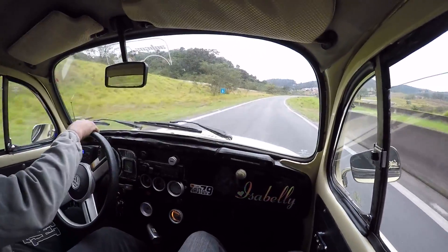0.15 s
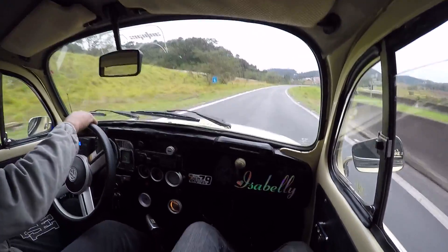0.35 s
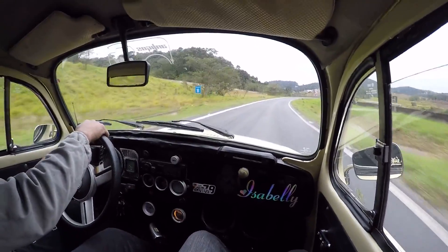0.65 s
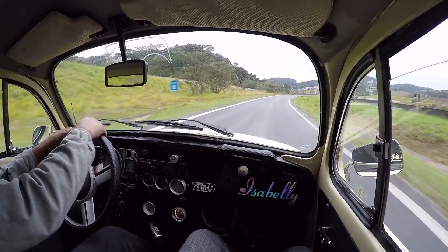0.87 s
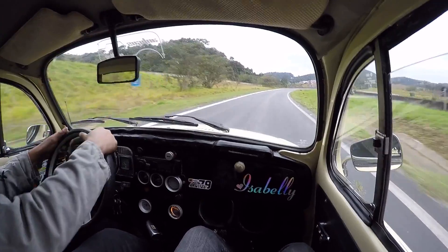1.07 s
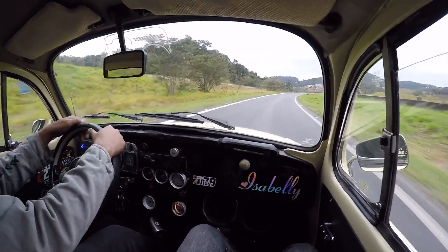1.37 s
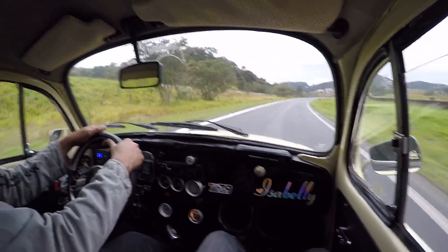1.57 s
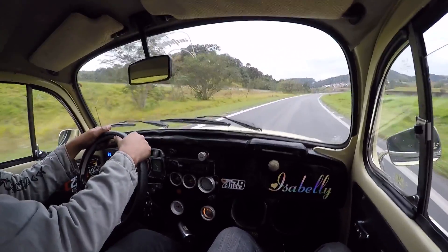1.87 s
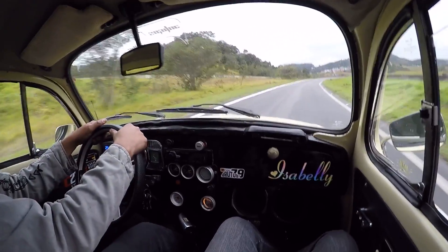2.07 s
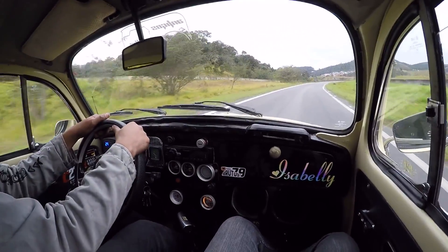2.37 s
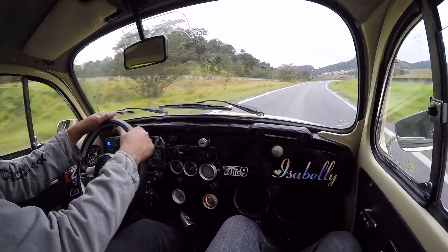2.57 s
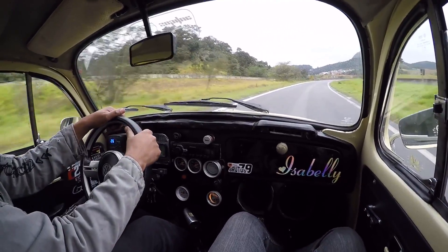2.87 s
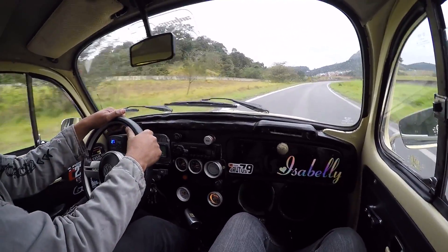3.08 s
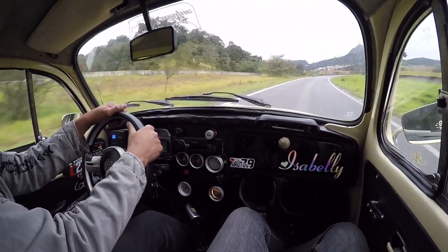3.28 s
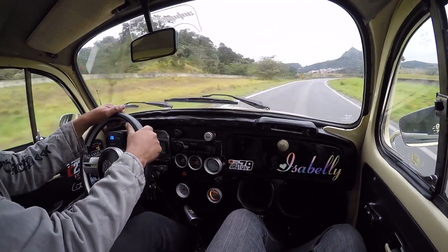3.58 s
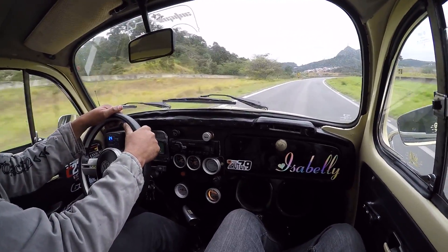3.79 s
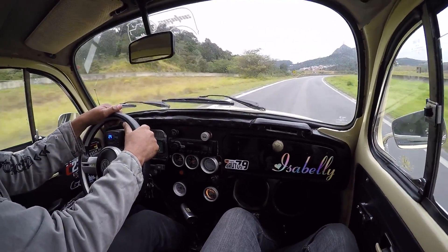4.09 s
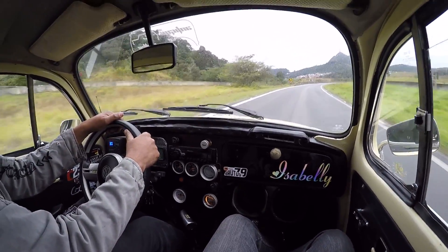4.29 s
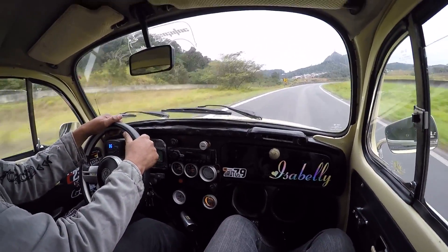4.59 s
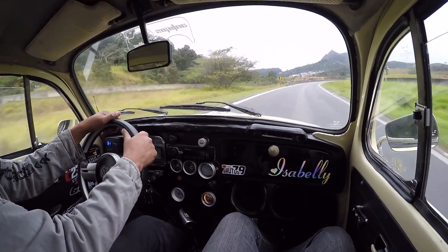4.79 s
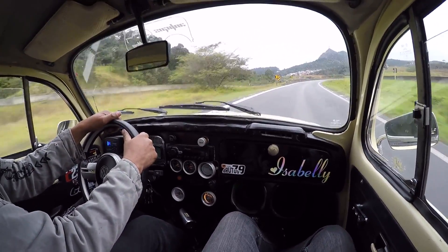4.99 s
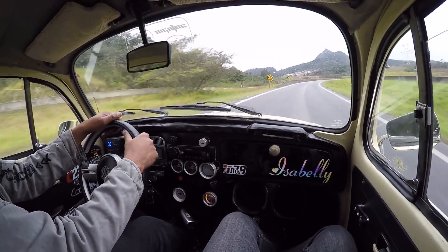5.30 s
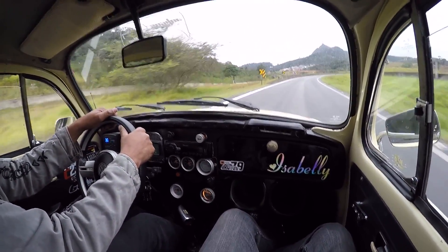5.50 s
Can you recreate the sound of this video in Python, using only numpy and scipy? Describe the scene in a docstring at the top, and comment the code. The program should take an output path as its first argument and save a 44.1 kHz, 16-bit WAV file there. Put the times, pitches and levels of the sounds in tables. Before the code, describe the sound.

Heard from a microphone inside an old car's cabin, an air-cooled four-cylinder engine drones loudly and slowly rises in pitch. Reflected tyre noise rushes off roadside walls in the first second. Low suspension rumble and irregular dull floor thumps continue, with a few faint trim ticks, a subtle pulsing knock midway and a brief rumble swell near four seconds.

```python
"""Inside an old car with an air-cooled four-cylinder engine that slowly gains speed on a country road.
Throughout, engine tones boom through the cabin over filtered noise: road rumble, bumps, roar, fan and wind.
Three roadside walls throw back a rush of noise in the first second; from 1.7 s the trim ticks four times.
Around 2.6 s a knock returns once per wheel turn, and from 2.2 to 4.6 s one engine tone whines faintly.
Near 4 s the road rumble swells briefly."""
import sys
import numpy as np
from scipy import signal
from scipy.io import wavfile
from scipy.ndimage import uniform_filter1d

SR = 44100
rng = np.random.default_rng(int(sys.argv[2]) if len(sys.argv) > 2 else 0)


def digitize_waveform(pressure):
    """Quantize a signal to 16-bit integers and store it at the path in sys.argv[1].

    Rows of a 2-D input are taken as channels; values are limited to [-1, 1].
    """
    field = np.atleast_2d(pressure).T
    bounded = np.clip(field, -1, 1)
    quanta = np.round(bounded * 32767).astype(np.int16)
    wavfile.write(sys.argv[1], SR, quanta)


N = 249165

# Roadside walls beside the open window.
# Each row: start in seconds, length in seconds, level of the rush in dB, lift of the wind hiss in dB.
WALLS = [(0.005, 0.05, -34.5, 0.1), (0.107, .3, -48, -1.5), (0.432, .45, -41.5, 1.5)]


def engine(turns, speed):
    """Each order (tone at a multiple of crank speed) swells or sinks as it crosses a cabin resonance."""
    # Tones at 1, 1.5, 2 .. times crank speed; the halves come from uneven cylinders.
    # Each row: level in dB at mean speed before the cabin, growth in dB per turn/s of speed.
    orders = [(-27, -0.5), (-31, 1.4), (-18, 0.09), (-42, -3), (-15.5, -0.22), (-36.5, -2), (-20, -0.13),
              (-34.5, 1), (-31, -0.36), (-38, 0), (-30, -0.5), (-42, -1.5), (-46.5, 0), (-43.5, -1.1),
              (-37.5, 0.5), (-43.5, -1), (-45, -0.5), (-49.5, -0.6), (-47, 0.5), (-41.5, 0.1), (-40.5, 0.5),
              (-47, 0.3), (-50.5, -1.5), (-49, 1)]
    # Cabin resonances and hollows. Each row: pitch in Hz, width in Hz, lift in dB.
    cabin = [(47.6, 3.9, 4), (97.9, 7.8, 2), (136.3, 7.1, -1), (146.2, 6.8, -2.5), (177, 3, -3),
             (196.5, 16.5, -8), (226.6, 15, 2), (269.3, 24, 3.5), (383.8, 20, 9), (519.5, 36, 12.5),
             (869.3, 34, 12.5), (912, 28, 0)]
    # The exhaust smears each blow: delay in turns per order squared, turns per order, turns.
    exhaust_lag = (.4, 1.38, .96)
    upper_db = -54.5  # one shared level for the remaining orders, up to 20
    whine_order, whine_db, whine_start_s, whine_length_s = 17.5, 8.5, 2.22, 2.4
    knock_share = 0.71  # share of the wheel knock in the tones above the fourth order

    out = np.zeros(N)
    step = 256  # slow changes are worked out only every 256 samples
    every, coarse = np.arange(N), np.arange(0, N, step)
    coarse_speed = speed[coarse]
    faster = coarse_speed - speed.mean()
    whine_lift_db = whine_db * beside(whine_start_s, whine_length_s)[coarse]
    knock_db = knock_share * wheel(turns)[coarse]
    levels = orders + [(upper_db, 0)] * 15
    for order, (db, growth_db) in zip(np.arange(1, 20.5, .5), levels):
        level_db = db + growth_db * faster
        for hz, width, peak_db in cabin:
            level_db = level_db + peak_db / (1 + (2 * (order * coarse_speed - hz) / width) ** 2)
        level_db = level_db + wander(6., step) / 2
        if order == whine_order:
            level_db = level_db + whine_lift_db
        if order > 4:
            level_db = level_db + knock_db
        size = np.sqrt(2) * gain_of(level_db)  # a sine of rms 1 peaks at root 2
        lag = np.polyval(exhaust_lag, order) + order * wander(4., step) / 200
        phase = order * turns - np.interp(every, coarse, lag)
        out += np.interp(every, coarse, size) * np.cos(2 * np.pi * phase)
    return out


def roar_and_wind(turns, speed):
    """Broad noise grows with speed, throbs as one cylinder knocks harder, and flutters with gusts."""
    # Rows for roar of engine and tyres, fan rush, wind hiss.
    # Each row: level in dB at mean speed, growth in dB per turn/s of crank speed.
    noise_levels = [(-24, 0.23), (-50.5, 0.42), (-61.5, 0.03)]
    # Tone colour of each noise. Each row: frequency in Hz, relative level in dB per Hz.
    roar_colour = [(200, 0), (300, 1), (390, -5), (450, -11.5), (520, 3.5), (620, -12.5), (760, -8.5),
                   (890, -3), (1020, -6), (1230, -6.5), (1470, -17.5), (1610, -14), (1730, -22),
                   (2200, -22), (3500, -32.5), (9000, -84.5)]
    fan_colour = [(1500, -24.5), (3000, -3), (5100, 0), (6300, -7), (7500, -19), (12000, -44)]
    hiss_colour = [(3000, -26.5), (6500, 1), (9700, 2), (11000, -3), (13000, -2), (15400, -6.5)]
    throb_lag = .85  # crank turns

    faster = speed - speed.mean()
    roar_db, fan_db, hiss_db = (db + growth_db * faster for db, growth_db in noise_levels)
    hiss_db = hiss_db + sum(lift_db * beside(s, length) for s, length, _, lift_db in WALLS)
    # One engine cycle is two crank turns; a weaker throb comes once per turn.
    throb = np.cos(np.pi * (turns - throb_lag))
    throb = throb + 0.6 * np.cos(2 * np.pi * (turns - throb_lag / 2))
    flutter = wander(top_hz=60.3, step=1)
    roar_db = roar_db + 0.47 * wheel(turns) + 0.2 * throb + 0.62 * flutter
    fan_db = fan_db + 0.24 * throb + 0.21 * flutter
    hiss_db = hiss_db + 0.67 * throb + 0.48 * flutter
    roar = gain_of(roar_db) * noise(roar_colour, size=1024, patchy_db=0.46)
    fan = gain_of(fan_db) * noise(fan_colour, size=256, patchy_db=0.5)
    hiss = gain_of(hiss_db) * noise(hiss_colour, size=256, patchy_db=0.5)
    return roar + fan + hiss


def road(turns):
    """The suspension rumbles steadily, its strongest swings held back; the floor pan thumps at each bump."""
    # Each row: time in seconds, level of the suspension's rumble in dB.
    rumble_level = [(0.0, -28), (0.08, -17), (0.16, -19.5), (1.62, -16.5), (3.89, -20.5), (4.03, -10.5),
                    (4.07, -21), (4.28, -17), (5.65, -15.5)]
    # Tone colour of suspension and floor pan. Each row: frequency in Hz, relative level in dB per Hz.
    rumble_colour = [(8, -13), (17, -6.5), (27, 6), (40, -5), (55, -6.5), (110, -36.5), (400, -110)]
    thump_colour = [(30, -40.5), (60, -2), (120, 12), (160, 6), (220, -7), (330, -22.5), (450, -29.5),
                    (1200, -100)]
    # Each row: time of the bump in seconds, strength in dB before its rise and fade.
    bumps = [(0.213, -16.5), (0.341, -18), (0.482, -10), (0.913, -18.8), (1.017, -19), (1.1, -10.5),
             (1.538, -16.7), (1.62, -23), (1.8, -34), (1.881, -25), (2.267, -15), (2.385, -10),
             (2.603, -25), (2.886, -18), (2.972, -18), (3.13, -17.5), (3.38, -12), (3.504, -17),
             (4.469, -13.5), (4.668, -11), (4.826, -20), (5.061, -10), (5.219, -13), (5.377, -16),
             (5.457, -14), (5.537, -30)]
    rise_s, t60_s = .015, 0.23  # t60: time to fade by 60 dB
    even_road_db = -25  # floor pan on even road, before the wheel knock

    rumble = noise(rumble_colour, size=4096, patchy_db=-4.0)
    envelope = abs(signal.hilbert(rumble))
    rumble = evened(rumble / (envelope + 1) ** 0.87)  # strong swings are held back most
    shake, t = np.zeros(N + SR), np.arange(SR // 2) / SR
    for s, db in bumps:
        bump = np.minimum(t / rise_s, 1) * gain_of(db - 60 * t / t60_s)
        shake[round(s * SR):][:len(t)] += bump
    shake = shake[:N] + gain_of(even_road_db + wheel(turns))
    thumps = shake * noise(thump_colour, size=2048, patchy_db=3.2)
    return gain_of(follow(rumble_level)[0]) * rumble + thumps


def panels(speed):
    """Road and engine shake make two body panels drone: band-passed noise, loudest near one speed."""
    # Each row: pitch in Hz, width in Hz, resting level in dB, swell in dB,
    # speed of the strongest drone in crank turns per s, spread in turns per s.
    panel_rows = [(378, 92, -43, 14, 46.7, 1.2), (908, 17, -43, 9.5, 47.2, 0.56)]
    out = np.zeros(N)
    for hz, width, rest_db, swell_db, best, spread in panel_rows:
        level_db = rest_db + swell_db * np.exp(-((speed - best) / spread) ** 2)
        band = signal.butter(2, [hz - width / 2, hz + width / 2], "bandpass", fs=SR, output="sos")
        drone = evened(signal.sosfilt(band, rng.standard_normal(N)))
        out += gain_of(level_db) * drone
    return out


def wall():
    """Tyre noise is reflected into the open window while a wall passes."""
    # Tone colour of the rush. Each row: frequency in Hz, relative level in dB per Hz.
    rush_colour = [(500, -26.5), (950, 1.5), (1600, -1.5), (2600, -7), (3700, -17.5), (4500, -33.5),
                   (9000, -77.5)]
    level = sum(gain_of(db) * beside(s, length) for s, length, db, _ in WALLS)
    return level * noise(rush_colour, size=256, patchy_db=6.0)


def ticks():
    """Each tick of the trim is a short crack of noise with a brief ringing sine."""
    # Each row: start in seconds, level in dB, pitch of the ring in Hz,
    # time for the ring to fade by 60 dB in seconds, strength of the crack against the ring.
    tick_rows = [(1.728, -31.5, 4200, 0.0099, 3.5), (2.183, -39, 5500, 0.01, .8),
                 (2.944, -50, 11100, .006, 1.5), (4.646, -45, 6300, .06, 0.019)]
    out, t = np.zeros(N), np.arange(3000) / SR
    dull = signal.butter(2, [900, 5000], "bandpass", fs=SR)
    for s, db, hz, t60, snap in tick_rows:
        burst = rng.standard_normal(len(t)) * gain_of(-60 * t / .006)
        crack = snap * signal.lfilter(*dull, burst)
        ring = np.sin(2 * np.pi * hz * t) * gain_of(-60 * t / t60)
        at = round(s * SR)
        out[at:at + len(t)] += gain_of(db) * (crack + ring)
    return out


def wheel(turns):
    """A short swell in dB once per wheel turn, on one stretch of road."""
    depth_db, strongest_s, span_s = 6., 2.64, .8
    crank_per_wheel = 4  # crank turns per wheel turn
    lag, sharpness = .83, 2.5  # lag in wheel turns
    stretch = np.exp(-((np.arange(N) / SR - strongest_s) / span_s) ** 2)
    knock = np.exp(sharpness * (np.cos(2 * np.pi * (turns / crank_per_wheel - lag)) - 1))
    return depth_db * stretch * (knock - knock.mean())


def beside(start, length):
    """One from start for length seconds, with soft ends."""
    edge_s = 0.027
    t = np.arange(N) / SR - start
    return np.clip(np.minimum(t, length - t) / edge_s + .5, 0, 1)


def noise(spectrum, size, patchy_db):
    """Random short-time spectra, joined into noise whose level drifts in patches of time and pitch."""
    frames, hz = 4 * N // size + 5, np.fft.rfftfreq(size, 1 / SR)
    real, imaginary, patches = rng.standard_normal((frames, len(hz), 3)).T
    patches = uniform_filter1d(patches, size=12, axis=0)  # smooth across pitch
    patches = evened(uniform_filter1d(patches, size=8, axis=1))  # smooth across time
    level_db = read(spectrum, hz)[:, None] + patchy_db * patches
    z = (real + 1j * imaginary) * gain_of(level_db)
    return evened(signal.istft(z, nperseg=size, noverlap=size - size // 4)[1][:N])


def wander(top_hz, step):
    """Slow random drift of rms 1: sines over five octaves, one value every step samples."""
    t = np.arange(0, N, 64) / SR
    hz = np.geomspace(top_hz / 32, top_hz, 16)
    sines = np.sin(2 * np.pi * (hz * t[:, None] + rng.random(16)))
    slow = sines @ hz ** -.5  # slower sines are stronger
    return np.interp(np.arange(0, N, step) / SR, t, evened(slow))


def gain_of(db):
    """Turns decibels into a factor."""
    return 10 ** (np.asarray(db) / 20)


def evened(x):
    """Scales to rms 1."""
    return x / np.sqrt(np.mean(x ** 2) + 1e-20)


def read(points, hz):
    """Reads a spectrum between its points on a log-frequency axis."""
    f, value = np.transpose(points)
    return np.interp(np.log(hz + 1), np.log(f + 1), value)


def follow(rows):
    """Reads every column of a curve table, sample by sample."""
    s, *columns = np.transpose(rows)
    return [np.interp(np.arange(N) / SR, s, c) for c in columns]


def scene():
    """Adds all sources at one microphone."""
    # Each row: time in seconds, engine speed in crank turns per s.
    crank = [(0.0, 43.36), (1.03, 45.32), (2.05, 47.13), (3.08, 48.75), (4.11, 50.05), (4.62, 50.5),
             (5.65, 51.02)]
    speed, = follow(crank)
    turns = np.cumsum(speed) / SR
    mix = engine(turns, speed) + roar_and_wind(turns, speed) + road(turns)
    mix = mix + gain_of(wheel(turns)) * panels(speed) + wall() + ticks()
    return mix[None]


def record(dry):
    """Rounds the peaks off below full scale, then removes the highest treble."""
    knee = 8  # sharpness of the ceiling
    edge_hz = 15250
    held = dry / (1 + abs(dry) ** knee) ** (1 / knee)
    held = np.pad(held, ((0, 0), (255, 255)), "reflect", reflect_type="odd")  # room for the filter
    low_pass = signal.firwin(511, edge_hz, window=("kaiser", 9), fs=SR)
    return signal.oaconvolve(held, low_pass[None], "valid")


dry = scene()
out = record(dry)
digitize_waveform(out)
```